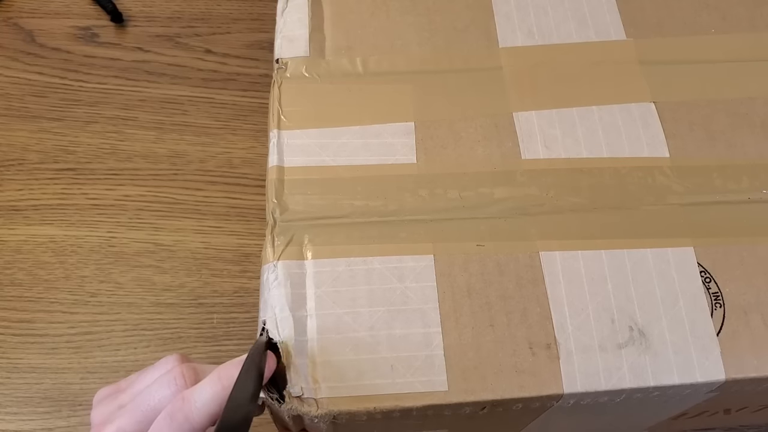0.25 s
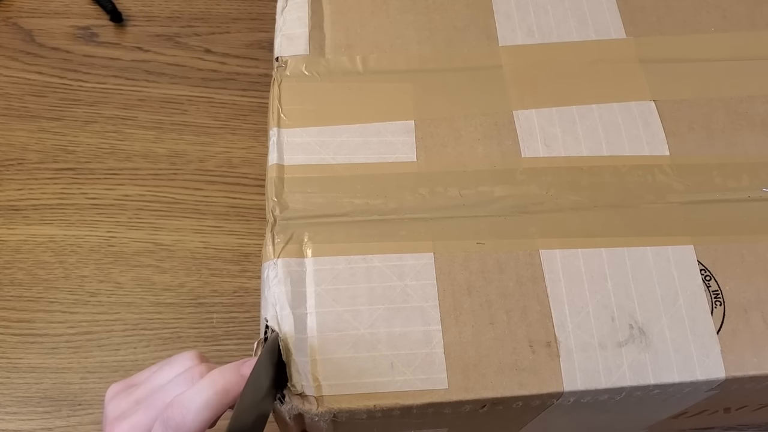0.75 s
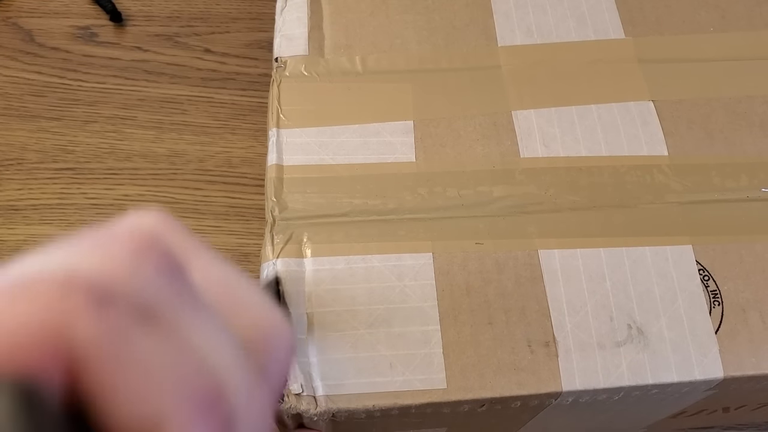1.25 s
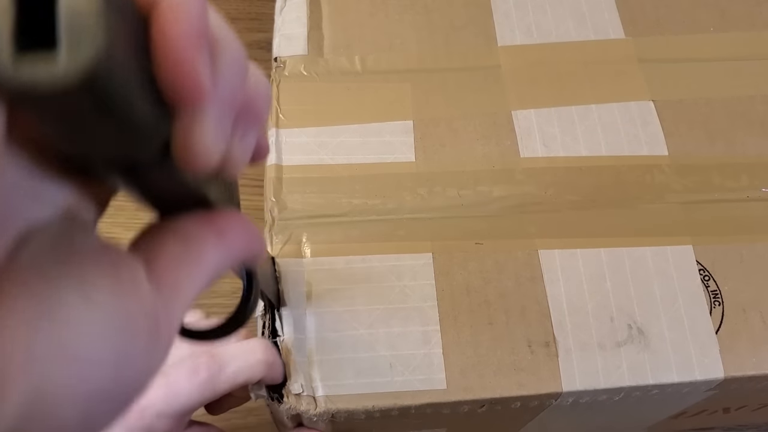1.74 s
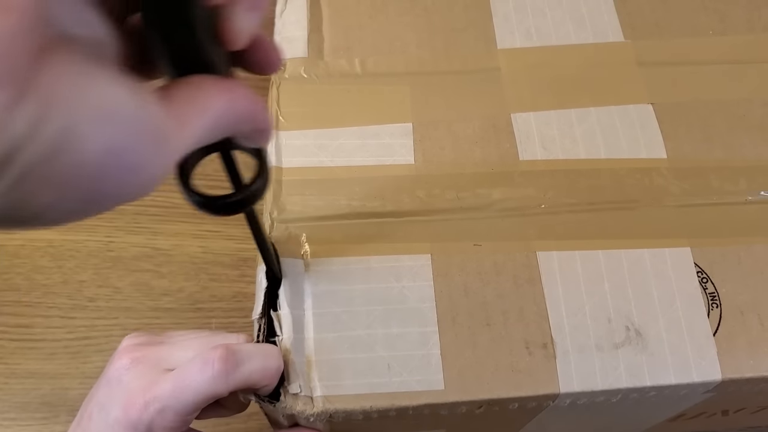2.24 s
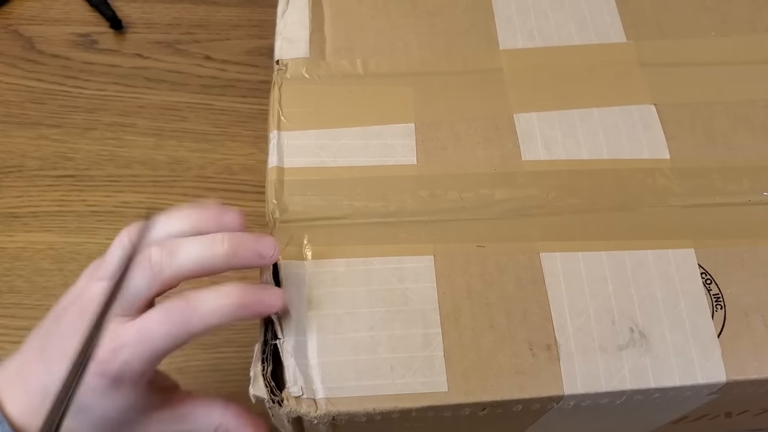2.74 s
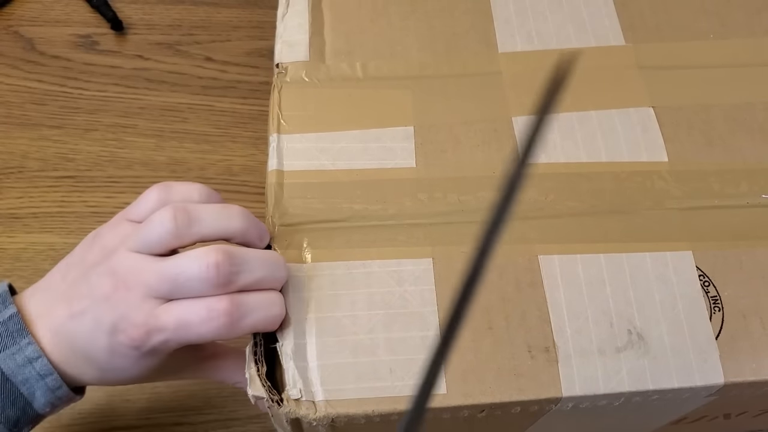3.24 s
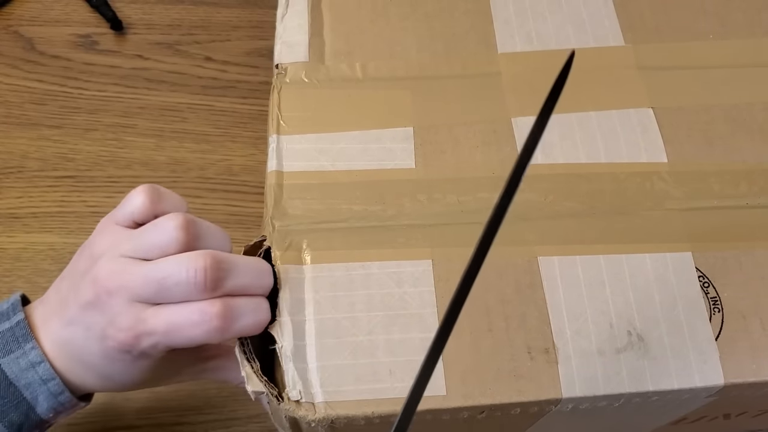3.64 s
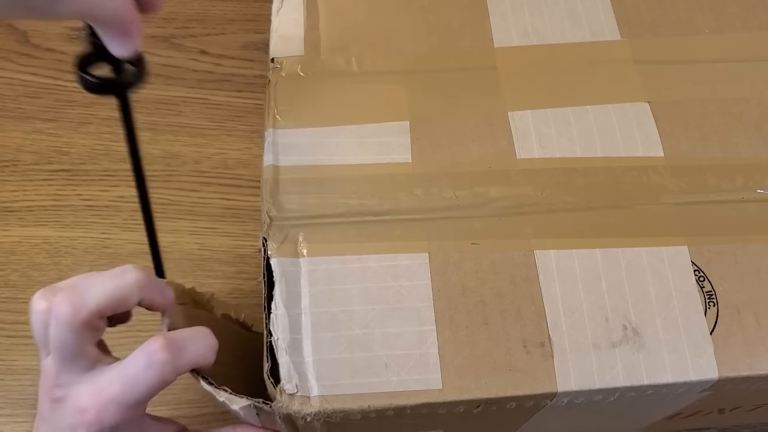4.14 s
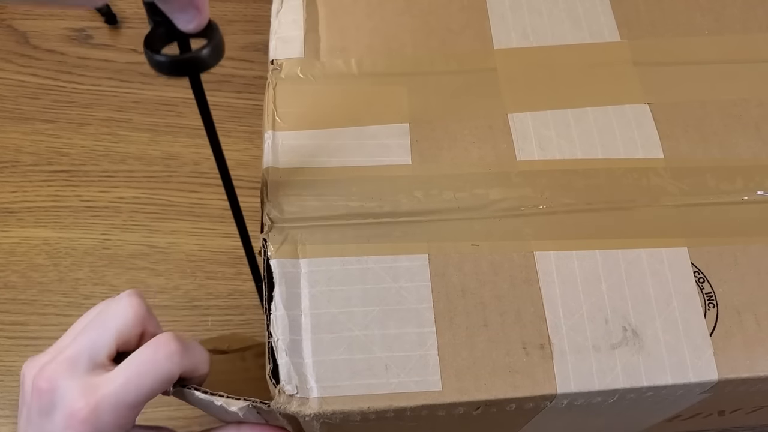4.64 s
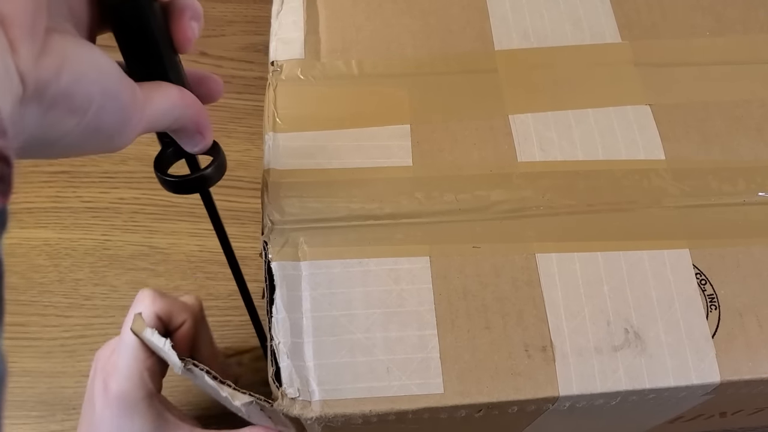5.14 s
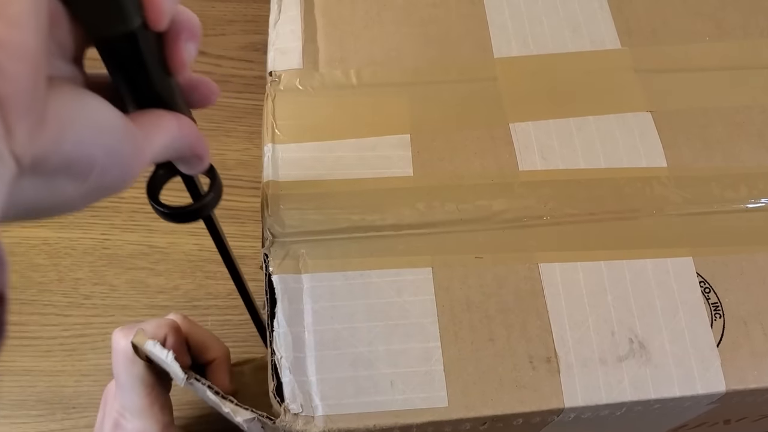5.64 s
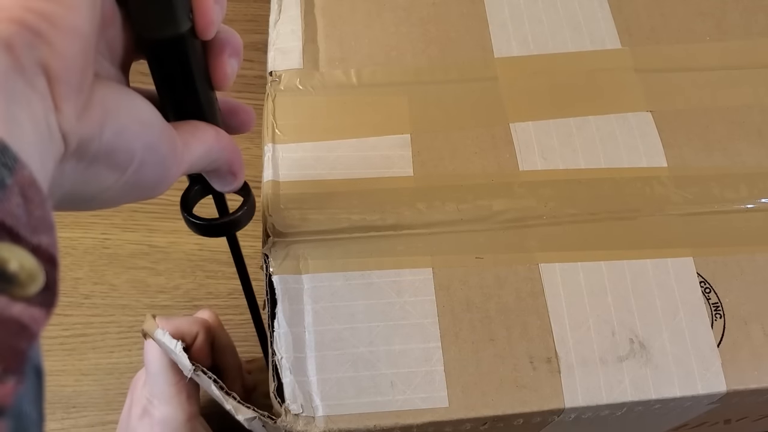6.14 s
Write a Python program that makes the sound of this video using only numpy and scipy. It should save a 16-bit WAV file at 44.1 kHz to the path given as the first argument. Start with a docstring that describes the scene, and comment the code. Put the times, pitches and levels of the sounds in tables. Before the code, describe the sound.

Close to the microphone in a small quiet room, a large blade pushes through taped cardboard. Faint creaks come first, then gritty strokes with crisp snaps, a soft pause with light rubbing, and a sudden loud crunching rip around four seconds. A hollow knock and tick follow, then more rasping pushes and dull box thumps to the end.

```python
"""Knife through a cardboard box

A large knife works along the taped edge of a box on a wooden table, close to the microphone in a small room.
Push by push, filtered noise and random fibre breaks make the board creak and the tape rasp. Short noise bursts
are the snaps, the bumps over the corrugations and one loud rip as a flap tears open. Trains of slips ring the
hollow box in thumps, decaying tones are ticks of the blade, and soft noise is the sliding hand, the rumble of
the box on the table and the quiet air; diffuse echoes give the room."""
import sys
import numpy as np
from scipy import signal
from scipy.fft import rfft, irfft, next_fast_len
from scipy.io import wavfile
from scipy.ndimage import uniform_filter1d, minimum_filter1d

SR = 44100
rng = np.random.default_rng(int(sys.argv[2]) if len(sys.argv) > 2 else 0)


def store_pcm(level_fs):
    """Save levels as 16-bit WAV."""
    pcm = np.round(np.clip(level_fs, -1, 1) * 32767).astype(np.int16)
    wavfile.write(sys.argv[1], SR, np.atleast_2d(pcm).T)


N = 281799
TIME = np.arange(N) / SR


def from_db(db):
    """Decibels to gain."""
    return 10 ** (np.asarray(db) / 20)


def rms_one(x):
    """Scale to an rms of 1."""
    return x / np.sqrt(np.mean(x ** 2) + 1e-20)


def in_time(rows):
    """Each column of a curve, read at every sample."""
    s, *columns = np.transpose(rows)
    return [np.interp(TIME, s, column) for column in columns]


def at_hz(points, hz):
    """Read a table on a log-frequency axis."""
    table_hz, values = np.array(points)[:, 0], np.array(points)[:, 1]
    return np.interp(np.log(hz + 1e-6), np.log(table_hz), values)


def band(x, edges_hz, kind="band", order=2):
    """Butterworth filter."""
    edges_hz = np.clip(edges_hz, 10, .45 * SR)
    return signal.sosfilt(signal.butter(order, edges_hz, kind, fs=SR, output="sos"), x)


def colour(x, spectrum):
    """Causal (minimum-phase) filter with the given spectrum; rms 1."""
    size = 2 * next_fast_len(len(x))
    hz = np.arange(size // 2 + 1) * SR / size
    cepstrum = irfft(np.log(from_db(at_hz(spectrum, hz))))
    # folding the cepstrum into its first half makes the filter causal
    response = np.exp(rfft(2 * cepstrum[:size // 2], size))
    return rms_one(irfft(rfft(x, size) * response)[:len(x)])


def drift(rate):
    """Slow chance: random knots of spread 1, this many per second, joined by straight lines."""
    knots = rng.standard_normal(N // 20)
    return np.interp(TIME * rate, np.arange(len(knots)), knots)


def add(out, s, x):
    """Mix x in at a time."""
    at = int(s * SR)
    out[at:at + len(x)] += x[:max(N - at, 0)]


def ring(modes, t):
    """Decaying modes after one blow."""
    tones = [from_db(db - 60 * t / t60) * np.sin(2 * np.pi * hz * t) for hz, db, t60 in modes]
    return sum(tones)


# colour of the creaking board, close up: [f/Hz, relative level/dB per Hz]
CREAK = [(65, -47), (110, 3.5), (162, -7), (218, 3), (278, -3.5), (313, 4.5), (394, 1), (472, 4.5),
         (628, 0.5), (678, 0.5), (1210, -10), (1430, -11.5), (1900, -31), (2400, -26.5), (3120, -27),
         (5280, -120)]
# colour of the rasp on tape and fibres, also of the crackle: [f/Hz, relative level/dB per Hz]
RASP = [(880, -21), (1500, -4), (1900, -12.5), (2190, -10), (2690, -8.5), (4080, -11.5), (5380, -7),
        (7030, -13), (8830, -10.5), (13800, -21.5), (16000, -28.5)]


def cutting(grip_db=2.5, grip_changes_per_s=170, bite_hz=(1350, 2500)):
    """The stroke makes the board creak and the tape rasp; both surge together as the blade sticks and slips."""
    creak_gain, rasp_gain = pushes()
    bite_db, _ = contact()
    grip = from_db(grip_db * np.clip(drift(grip_changes_per_s), -2, 2)) * catches()
    creak = panel(colour(grip * fibres(per_s=500, spread_db=1.0, smooth=0.83), CREAK))
    rasp = colour(grip * fibres(per_s=1500, spread_db=0.0, smooth=0.91), RASP)
    creaking = creak_gain * from_db(-0.5) * creak
    rasping = rasp_gain * (from_db(-6.5) * rasp + crackle())
    cut = creaking + rasping
    # steel on board is harsher than a rubbing hand
    return cut + (from_db(bite_db) - 1) * band(cut, bite_hz, order=1)


# pushes of the blade and hand: [hardest moment t/s, build-up/s, let-go/s, relative creak level/dB,
# relative rasp level/dB, bite of steel/dB, sizzle of tape/dB]
STROKES = [(.24, 0.015, 0.078, -52.5, -82, -12, -13), (0.378, 0.044, 0.042, -39.5, -46.5, -0.5, -2),
           (.59, .08, 0.12, -61.5, -69, 5, -3), (.85, 0.11, 0.056, -65.5, -71.5, 1, -12),
           (1.147, 0.11, 0.078, -33, -40.5, 8, 0.5), (1.316, 0.042, 0.083, -36, -35.5, 6.5, 1.5),
           (1.481, 0.057, 0.028, -52.5, -50, 6.5, -10), (1.576, 0.052, .1, -45, -43.5, 7.5, -24),
           (1.862, 0.13, .14, -38, -41.5, 6, -11), (2.14, 0.044, 0.044, -51.5, -73, 3, -16),
           (2.203, 0.017, 0.11, -39.5, -44.5, 3.5, 7), (2.45, .12, 0.19, -49.5, -52, 11.5, -25),
           (2.605, 0.12, 0.11, -59, -48, -6, 1.5), (2.723, 0.056, 0.24, -49, -65.5, 1, 1),
           (3.075, 0.039, 0.11, -54, -61, 1, 9), (3.249, 0.065, .08, -55.5, -65, 12.5, 7),
           (3.412, 0.098, 0.022, -48.5, -47.5, 0, 8.5), (3.63, 0.075, 0.028, -52, -66, 1.5, 2),
           (3.82, 0.048, .15, -48, -49, 6, 1.5), (3.98, 0.11, .03, -47, -56, 7, 5),
           (4.055, 0.036, 0.11, -31.5, -28.5, 11, 0.5), (4.52, 0.091, 0.17, -48, -46.5, 5, 9.5),
           (4.8, 0.11, 0.16, -42.5, -54.5, 12.5, 0), (4.95, 0.088, 0.073, -49, -41.5, 3, 5.5),
           (5.169, 0.037, .14, -47, -43.5, 10.5, 0), (5.478, 0.15, 0.097, -47, -48, 15, 13.5),
           (5.717, 0.1, 0.074, -42.5, -41, 1.5, -17), (5.827, 0.021, 0.056, -42, -42, 4.5, 0),
           (5.905, 0.13, 0.12, -47, -70, -8, 4), (6.062, 0.099, 0.062, -48.5, -49.5, 4.5, -7),
           (6.24, 0.093, 0.44, -55, -47, 3, -10)]
SWELL_DB = 15   # rise of a push to its hardest moment, and the same fall after it
CATCH_S, RELEASE_S = 0.0076, 0.012   # time constants as the contact takes hold and dies away


def pushes():
    """Creak and rasp gains: every push builds to its hardest moment, slackens and lets go."""
    creak, rasp = np.zeros(N), np.zeros(N)
    for s, build_s, slack_s, creak_db, rasp_db, _, _ in STROKES:
        before_s, after_s = min(s, build_s + .1), slack_s + .1
        t = np.arange(-int(before_s * SR), int(after_s * SR)) / SR
        away = np.minimum(np.maximum(-t / build_s, t / slack_s), 1)
        # beyond the build-up and the slackening the contact dies away
        lifted = np.maximum(np.maximum((-t - build_s) / CATCH_S, (t - slack_s) / RELEASE_S), 0)
        force = from_db(-SWELL_DB * away) * np.exp(-lifted)
        start = max(s + t[0], 0)
        add(creak, start, from_db(creak_db) * force)
        add(rasp, start, from_db(rasp_db) * force)
    return creak, rasp


def contact():
    """Bite and sizzle in dB pass from one push to the next as the blade moves between board and tape."""
    return in_time([(s, bite_db, sizzle_db) for s, *_, bite_db, sizzle_db in STROKES])


def catches(per_s=45, lift_db=4.0, fade_s=0.0042):
    """Gain of the small jerks at random moments when the edge catches a bundle of fibres and lets go."""
    # lift_db is for a jerk of size 1
    jerks = (rng.random(N) < per_s / SR) * rng.uniform(0.38, 3.9, N)
    fading = signal.lfilter([1], [1, -np.exp(-1 / (fade_s * SR))], jerks + 1e-18)
    return 1 + (from_db(lift_db) - 1) * fading


def fibres(per_s, spread_db, smooth):
    """Fibres break at random, their sizes uneven by the spread, over smooth friction."""
    sizes = from_db(spread_db * np.minimum(rng.exponential(1, N), 4)) * rng.choice([-1, 1], N)
    breaks = rms_one(sizes * (rng.random(N) < per_s / SR))
    return breaks + smooth * rng.standard_normal(N)


# resonances of the cut panel: [f/Hz, width/Hz]
PANEL = [(313, 37), (484, 340), (640, 18), (880, 180), (1400, 290)]


def panel(x, wander_db=6.0, wander_rate=22):
    """The blade's changing place and pressure favour now one panel resonance, now another."""
    for hz, width_hz in PANEL:
        favour = from_db(wander_db * np.clip(drift(wander_rate), -2, 2))
        x = x + (favour - 1) * band(x, (hz - width_hz / 2, hz + width_hz / 2), order=1)
    return rms_one(x)


def crackle(per_s=30, level_db=-19, spread_db=4.5, length_s=0.0018):
    """Threads of tape part at random in tiny cracks of fading noise, heard during a push."""
    sizes = from_db(spread_db * np.clip(rng.standard_normal(N), -2, 2)) * (rng.random(N) < per_s / SR)
    bursts = signal.lfilter([1], [1, -np.exp(-1 / (length_s * SR))], sizes + 1e-18)
    return from_db(level_db) * colour(bursts * rng.standard_normal(N), RASP)


def taped(x, edge_hz=10500):
    """Plastic tape sizzles higher than paper does, so the top is raised or lowered with the contact."""
    _, sizzle_db = contact()
    paper = band(x, edge_hz, "low", order=1)
    return paper + from_db(sizzle_db) * (x - paper)


# board and tape giving way, the loud rip among them: [t/s, low part level/dB, middle part level/dB,
# crisp part level/dB]
SNAPS = [(0.222, -54.5, -74, -81), (0.363, -40, -58, -51), (0.42, -40, -53, -62), (1.07, -53, -61, -54),
         (1.135, -57, -38, -39), (1.146, -36, -44, -39.5), (1.298, -37, -62, -43),
         (1.309, -35.5, -33.5, -37), (1.799, -42, -37.5, -39), (1.918, -43.5, -49, -46),
         (2.185, -39, -54, -68), (2.266, -63, -47, -43.5), (2.752, -32, -43, -47.5), (3.315, -63, -68, -56),
         (3.352, -57, -63, -51), (3.373, -45, -65, -45), (3.395, -64, -55, -50), (3.412, -40, -36.5, -37),
         (3.435, -37, -35, -42.5), (3.515, -35, -38.5, -40), (3.621, -52, -49.5, -53),
         (3.943, -33, -54.5, -56.5), (3.984, -46, -57, -40.5), (4.004, -47, -43, -39),
         (4.025, -21, -21.5, -21.5), (4.045, -15.5, -17, -16), (4.062, -19, -13.5, -15.5),
         (4.073, -18.5, -19.5, -19.5), (4.079, -15.5, -17, -31), (4.084, -18, -34, -19.5),
         (4.095, -61, -41, -27), (4.107, -22.5, -24.5, -28), (4.436, -57, -52.5, -52.5),
         (4.522, -22.5, -22.5, -37), (4.913, -37.5, -62, -51), (4.937, -41.5, -73, -42.5),
         (4.96, -58, -38, -44), (5.075, -96, -50, -48.5), (5.11, -73, -50, -44), (5.154, -43.5, -35.5, -39),
         (5.443, -54, -47.5, -50), (5.508, -37, -48, -44.5), (5.562, -41, -65, -55),
         (5.6177, -36.5, -34.5, -51), (5.674, -43, -53, -47), (5.777, -46, -47, -41),
         (5.826, -37.5, -45.5, -68), (6.072, -44, -46.5, -44), (6.116, -64, -57, -47.5),
         (6.164, -69, -41, -47.5), (6.216, -24.5, -47, -44.5), (6.244, -40, -58, -46)]
# colour of the torn board: [f/Hz, relative level/dB per Hz]
TEAR = [(88, -55), (150, -31.5), (193, 0.5), (254, -3), (309, -5.5), (361, -20), (578, 7.5), (774, -10.5),
        (923, -2.5), (1190, -17.5), (1480, -4), (2450, -11), (2700, -15), (10200, -21), (16000, -36)]


def snaps(length_s=0.0069, rise_s=.0005, crisp_length_s=0.0065, variety_db=3.0):
    """Each snap is a sharp crack and a few milliseconds of ripples in the board, with a colour of its own."""
    out, t = np.zeros(N), TIME[:2048]
    swell = (1 - np.exp(-t / rise_s)) * np.exp(-(t / length_s) ** 3)
    crack = np.exp(-(t / crisp_length_s) ** 1.5)
    parts = [((150, 1100), swell), ((1100, 3500), swell), ((3500, 18000), crack)]
    pitches = np.geomspace(100, 18000, 40)
    for s, *levels_db in SNAPS + flute_bumps():
        own_db = at_hz(TEAR, pitches) + variety_db * rng.standard_normal(len(pitches))
        ripples = colour(rng.standard_normal(len(t)), np.column_stack([pitches, own_db]))
        for (edges_hz, shape), level_db in zip(parts, levels_db):
            burst = band(ripples * shape, edges_hz, order=3)
            loudness = np.sqrt(np.sum(burst ** 2) / (length_s * SR))
            add(out, s, from_db(level_db) * burst / loudness)
    return out


# the blade bumping over the corrugations: [start t/s, end t/s, low part level/dB]
FLUTE_RUNS = [(3.872, 3.92, -40.5), (4.677, 4.82, -39)]
FLUTE_S = 0.039   # time from ridge to ridge
FLUTE_MIDDLE_DB, FLUTE_CRISP_DB = -8.5, -19   # upper parts of a bump against its low part


def flute_bumps():
    """Dull little snaps, one at each ridge of the corrugation."""
    return [(s, db, db + FLUTE_MIDDLE_DB, db + FLUTE_CRISP_DB)
            for start, end, db in FLUTE_RUNS
            for s in np.arange(start, end, FLUTE_S)]


# the blade juddering through and jolting the box: [t/s, drive level/dB, slip rate/Hz, length/s,
# knock of the wall level/dB]
THUMPS = [(0.05, -50.5, 490, 0.026, -72.5), (0.24, -53, 83, 0.025, -78), (1.14, -39, 310, 0.031, -44),
          (1.305, -32.5, 305, 0.026, -52), (2.758, -50, 217, 0.03, -46.5), (4.078, -26, 290, 0.045, -45.5),
          (4.524, -28, 404, 0.022, -32), (4.912, -39, 297, 0.031, -48), (5.633, -18.5, 140, 0.017, -32.5),
          (6.219, -25, 145, 0.017, -25.5), (6.238, -34, 207, 0.013, -35.5)]
# modes of the hollow box: [f/Hz, relative level/dB, t60/s]
BOX = [(135, -3.5, 0.079), (164, -5, .05), (207, -0.5, 0.09), (311.3, -11, 0.045), (407, -18, 0.13),
       (480, -10.5, 0.1)]


def thumps(knock_s=0.017, knock_hz=(300, 1700), lowest_hz=112, slip_jitter=0.13):
    """A quick run of slips pumps the hollow box while its wall gives a dull knock."""
    out, t = np.zeros(N), TIME[:SR // 2]
    for s, level_db, slips_per_s, length_s, knock_db in THUMPS:
        # jitter is the unevenness of the gaps, as a share of their length
        gaps = np.exp(slip_jitter * rng.standard_normal(400)) / slips_per_s
        # one impulse at the start and one at the end of each gap
        impulses = np.diff(np.searchsorted(np.cumsum(gaps), t), prepend=-1)
        slips = impulses * np.exp(-(t / length_s) ** 3)
        add(out, s, from_db(level_db) * signal.fftconvolve(ring(BOX, t), slips)[:len(t)])
        knock = rms_one(band(rng.standard_normal(len(t)), knock_hz, order=3))
        add(out, s, from_db(knock_db) * knock * np.exp(-t / knock_s))
    # the box radiates little below its lowest mode
    return band(out, lowest_hz, "high", order=3)


# the blade slipping free and ticking: [t/s, level/dB before the modes' own levels]
TICKS = [(4.526, -24.5), (4.963, -46), (5.156, -44.5), (5.623, -47)]
# the steel blade, damped by hand and board: [f/Hz, relative level/dB, t60/s]
BLADE = [(1620, 12, 0.019), (1620, -15, .02), (3060, -41, 0.041), (8000, 12, 0.0025)]


def ticks():
    """The blade rings briefly in decaying modes when it slips free."""
    out = np.zeros(N)
    for s, level_db in TICKS:
        add(out, s, from_db(level_db) * ring(BLADE, TIME[:SR // 4]))
    return out


# fingers sliding over the box: [middle t/s, half length/s, level/dB]
RUBS = [(.6, 0.058, -57.5), (0.843, 0.032, -63), (2.84, 0.11, -68), (3.19, 0.28, -74)]
# colour of the sliding fingers: [f/Hz, relative level/dB per Hz]
RUB = [(200, -13), (450, -1), (630, 4.5), (900, -6), (1150, -9.5), (1400, -3), (1750, -17), (3000, -45)]


def rubbing():
    """The holding hand slides to a new grip with a soft, hollow hush of swelling noise."""
    gain = sum(from_db(level_db) * np.exp(-((TIME - s) / half_s) ** 2) for s, half_s, level_db in RUBS)
    return gain * colour(rng.standard_normal(N), RUB)


# the box lurching on the table: [t/s, relative rumble level/dB]
LURCHES = [(.03, -72), (.25, -55.5), (1.1, -54), (1.3, -48.5), (1.47, -53), (1.83, -54), (2.25, -48.5),
           (2.52, -57.5), (2.83, -52), (3.38, -53), (3.58, -66), (3.81, -52.5), (4.101, -46), (4.99, -58),
           (5.18, -59), (5.43, -64), (5.66, -53), (5.839, -58.5), (6.25, -48)]
# colour of the rumble: [f/Hz, relative level/dB per Hz]
RUMBLE = [(13, -40), (22, -11.5), (54, 7.5), (91, 0.5), (124, -1.5), (156, -4), (180, -4), (230, -33),
          (400, -120)]
LURCH_RISE_S, LURCH_FALL_S = 0.042, 0.076   # time constants of a lurch
HANDLING_DB = -65.5   # held box between lurches, on the same relative scale as the lurches


def shifting():
    """The held box rumbles on the table, swelling at each lurch."""
    power = np.full(N, from_db(HANDLING_DB) ** 2)
    for s, level_db in LURCHES:
        away = np.maximum((s - TIME) / LURCH_RISE_S, (TIME - s) / LURCH_FALL_S)
        power += (from_db(level_db) * np.exp(-away)) ** 2
    return np.sqrt(power) * from_db(2.5) * colour(rng.standard_normal(N), RUMBLE)


# colour of the quiet room at the microphone: [f/Hz, relative level/dB per Hz]
AIR = [(15, -24), (25, -11.5), (134, -3), (190, -6.5), (659, -20.5), (1100, -46), (1330, -31), (3340, -52),
       (9570, -41.5), (16000, -53)]


def quiet_air(level_db=-68.5):
    """The still room is a steady, faint noise, strongest in the lows."""
    return from_db(level_db) * colour(rng.standard_normal(N), AIR)


# how long the small room rings: [f/Hz, t60/s]
ROOM_T60 = [(150, 0.39), (600, 0.31), (2500, 0.31), (7000, 0.3), (14000, 0.23)]


def room(x, first_echo_s=0.0015, build_s=0.01, dull_hz=11000):
    """Diffuse echoes build up after a short gap and die band by band."""
    t, tail = TIME[:SR * 3 // 4], 0
    edges = np.geomspace(60, 18000, 9)
    for low, high in zip(edges, edges[1:]):
        t60 = at_hz(ROOM_T60, np.sqrt(low * high))
        tail = tail + band(rng.standard_normal(len(t)), (low, high)) * from_db(-60 * t / t60)
    build = np.clip((t - first_echo_s) / build_s, 0, 1)
    tail = band(tail * build, dull_hz, "low", order=1)
    return signal.fftconvolve(x, tail / np.sqrt(np.sum(tail ** 2)))[:N]


def scene():
    """The knife and the box close to the microphone, with the room around them."""
    cut = cutting() + rubbing()
    thump, tick = thumps(), ticks()
    direct = taped(cut + snaps()) + tick + thump
    rumble = shifting()
    air = quiet_air()
    echoes = room(from_db(-9.5) * (taped(cut) + tick) + from_db(-11.5) * thump)
    # the panel sends different ripples toward each wall, so the tail of a snap is smooth
    for wall in range(3):
        echoes = echoes + from_db(-15.0) * room(taped(snaps()))
    return (direct + rumble + air + echoes)[None]


CUTOFF_HZ = 16000


def record(dry, ceiling=0.47):
    """A fast limiter holds the loudest peaks down, and the top is cut."""
    needed = np.minimum(1, ceiling / (np.abs(dry) + 1e-9))
    # the lowest gain needed nearby, smoothed over about 3 ms
    gain = uniform_filter1d(minimum_filter1d(needed, size=130), size=130)
    top_cut = signal.ellip(10, .1, 80, CUTOFF_HZ, fs=SR, output="sos")
    return signal.sosfilt(top_cut, gain * dry)


dry = scene()
out = record(dry)
store_pcm(out)
```